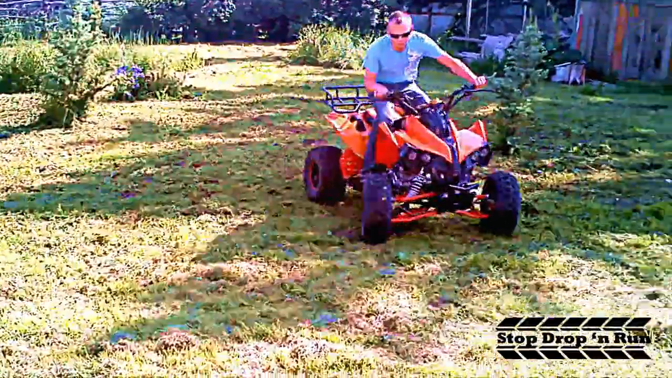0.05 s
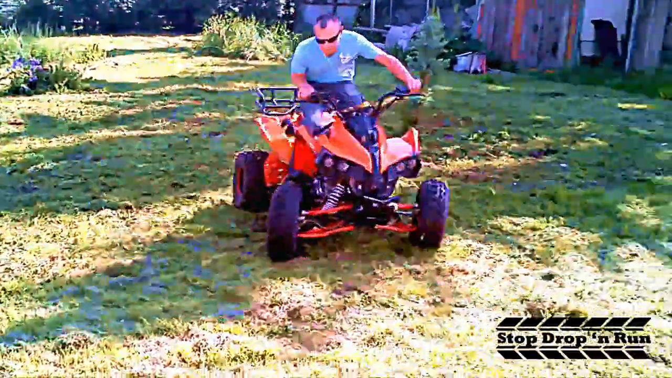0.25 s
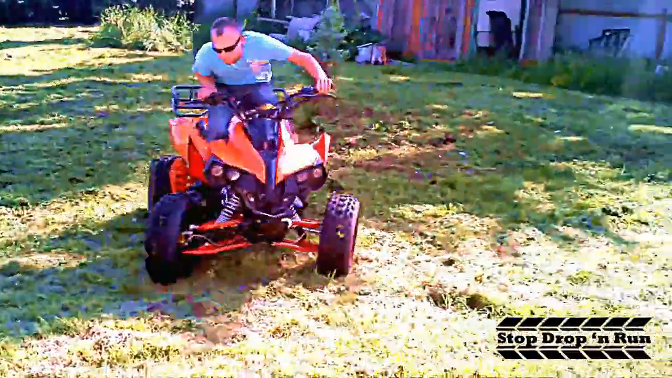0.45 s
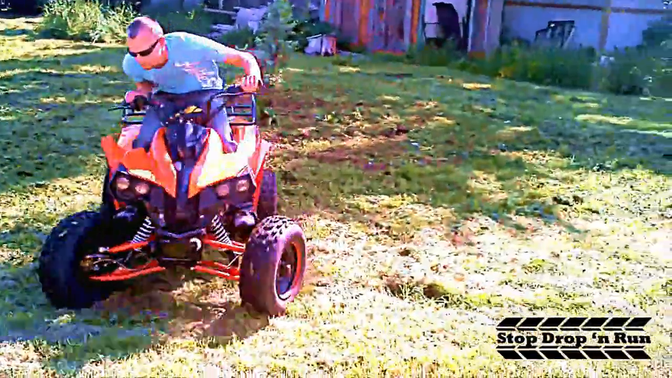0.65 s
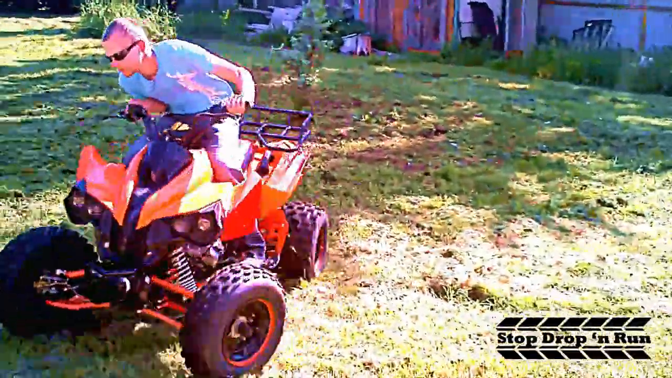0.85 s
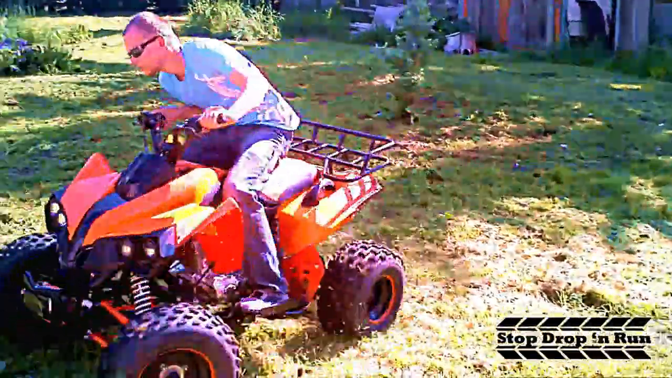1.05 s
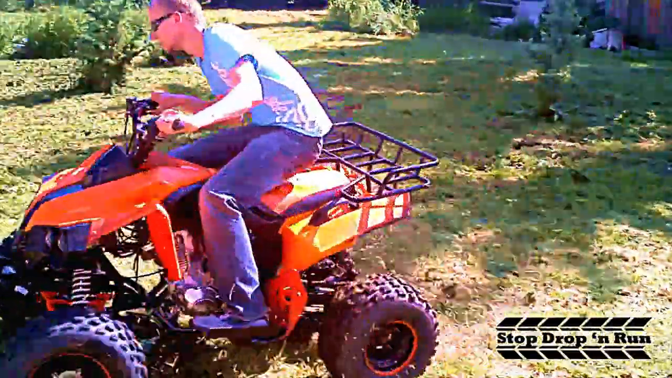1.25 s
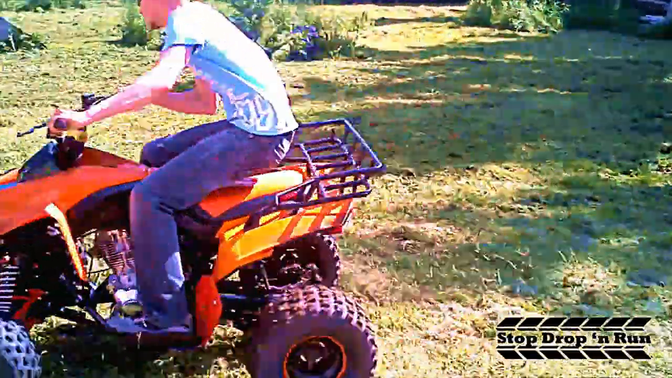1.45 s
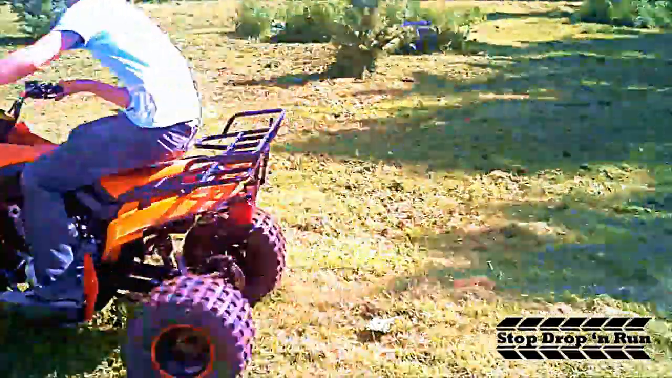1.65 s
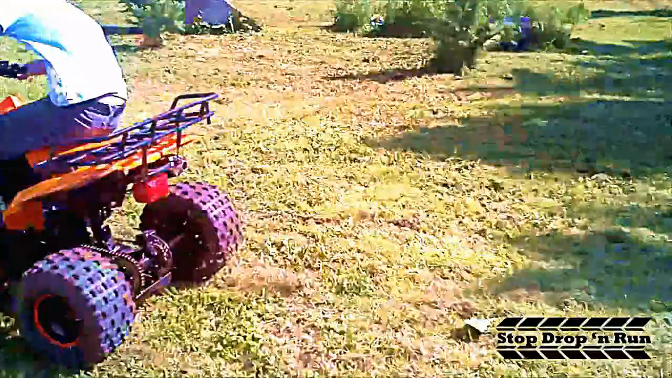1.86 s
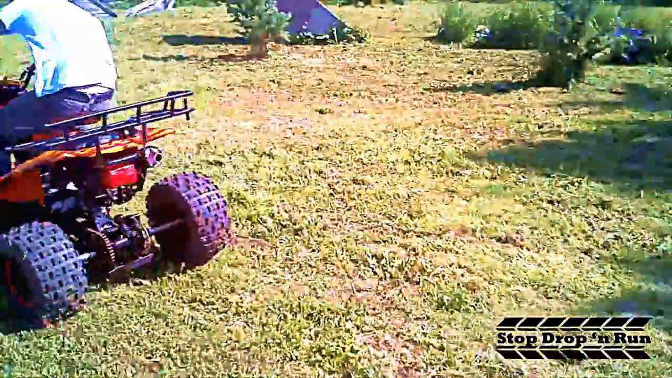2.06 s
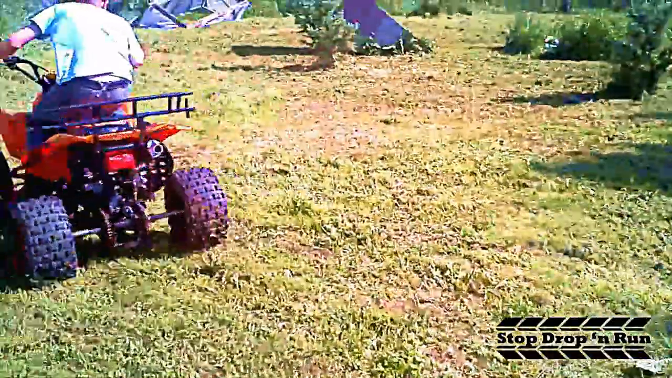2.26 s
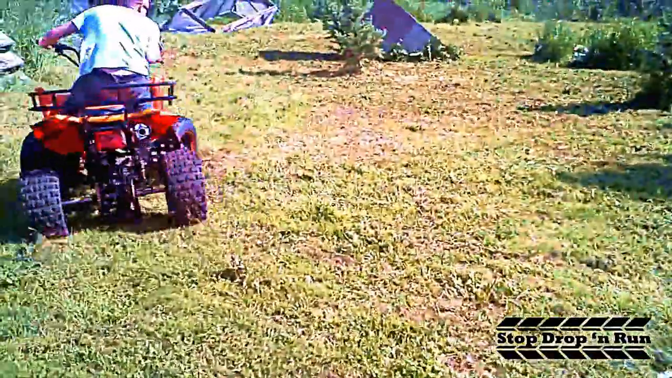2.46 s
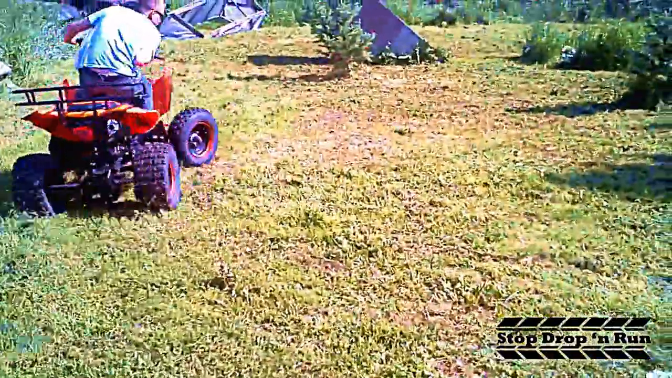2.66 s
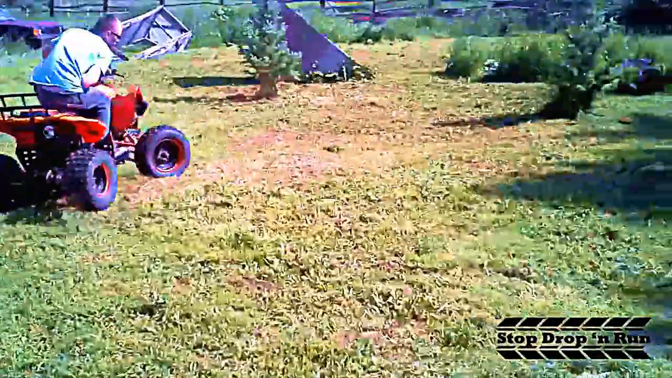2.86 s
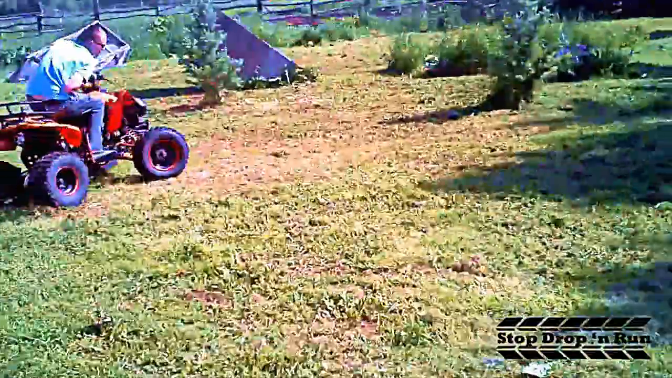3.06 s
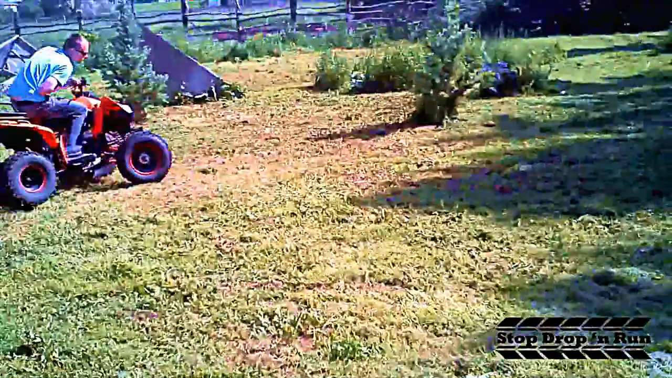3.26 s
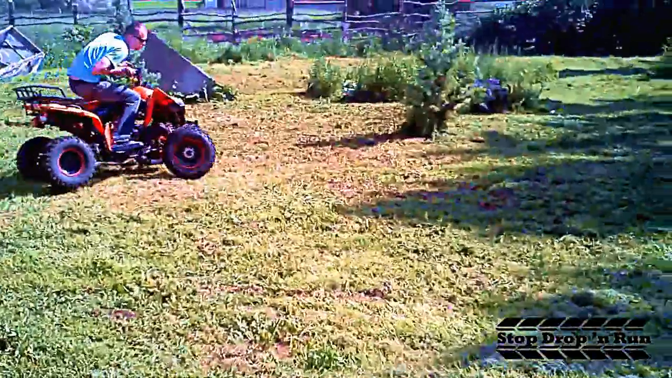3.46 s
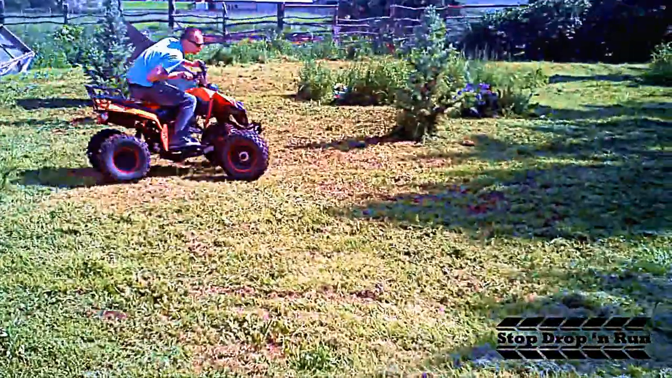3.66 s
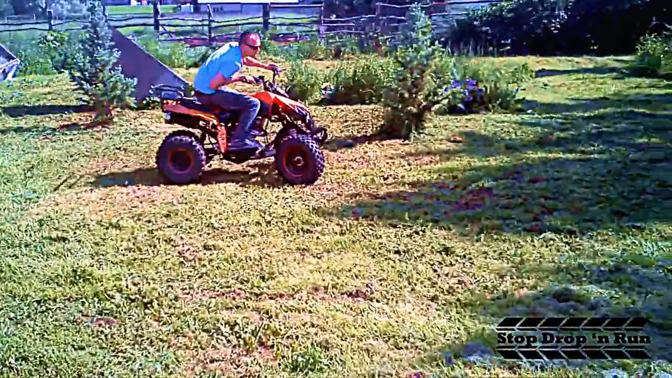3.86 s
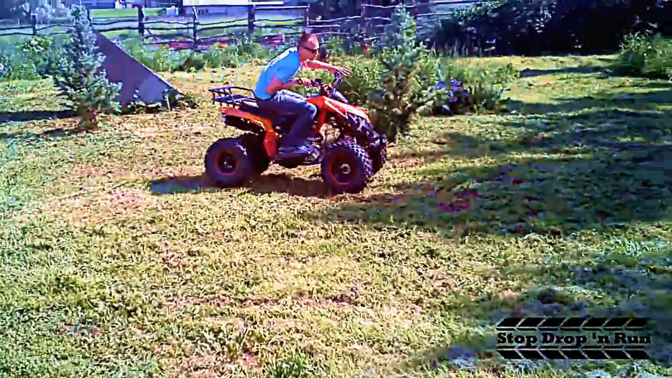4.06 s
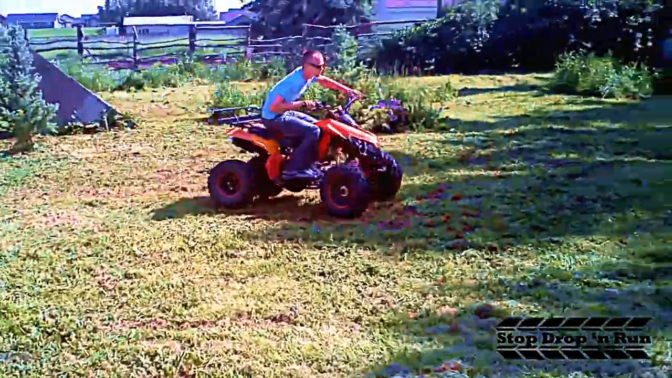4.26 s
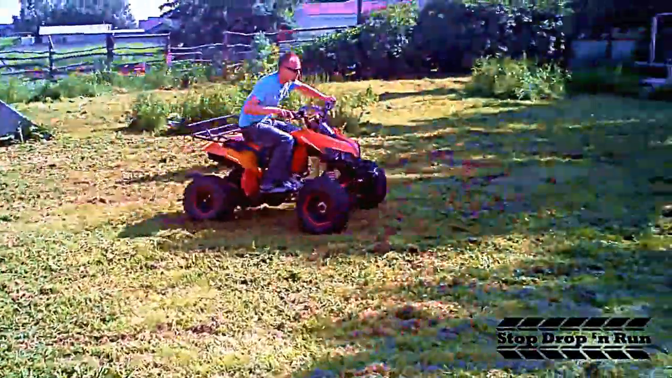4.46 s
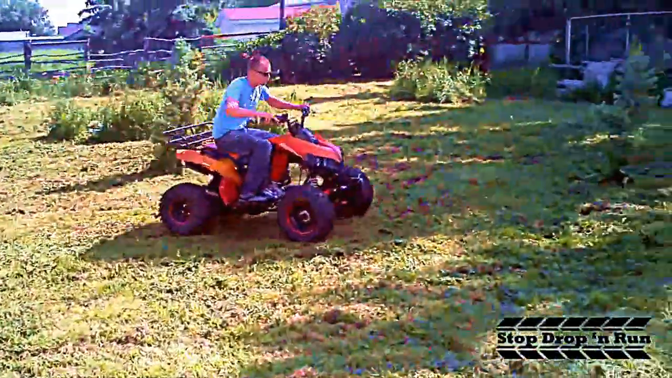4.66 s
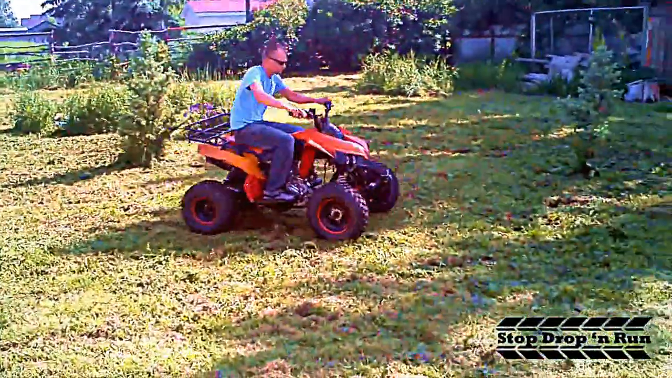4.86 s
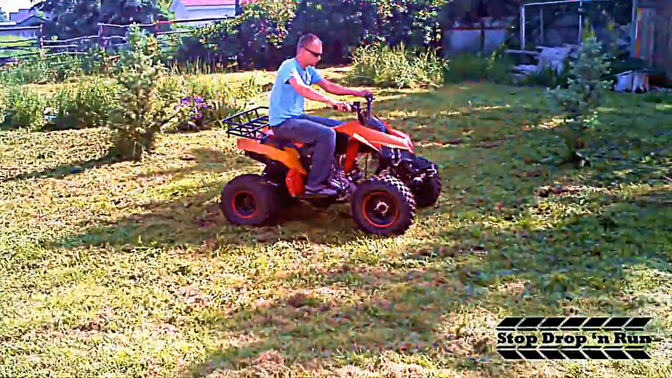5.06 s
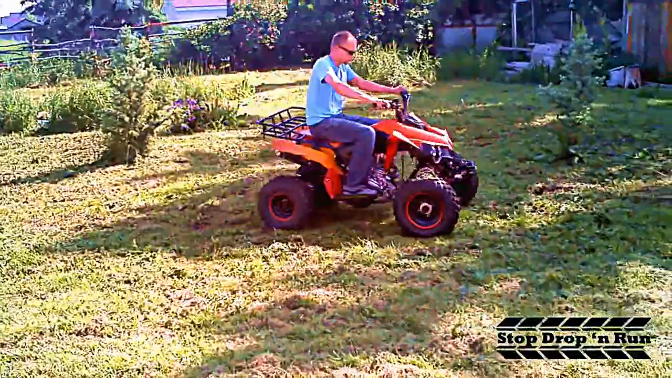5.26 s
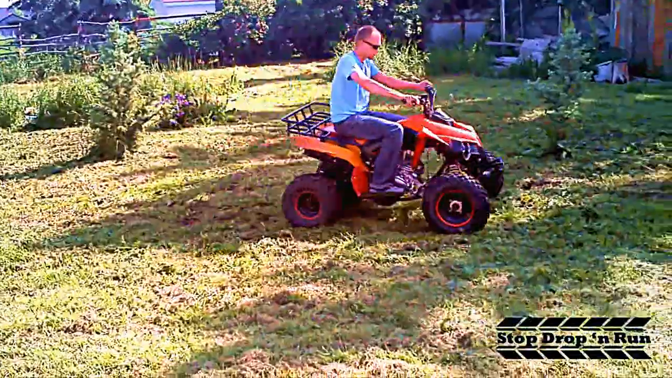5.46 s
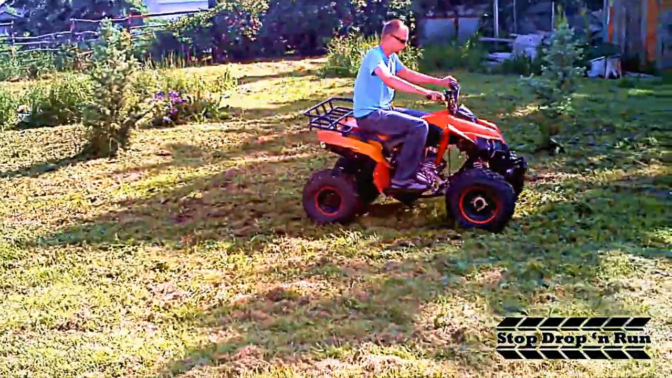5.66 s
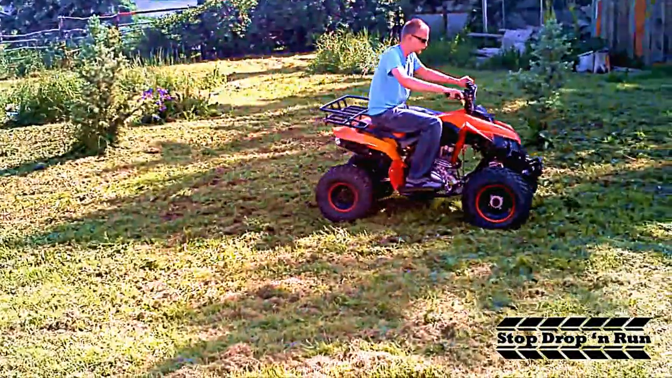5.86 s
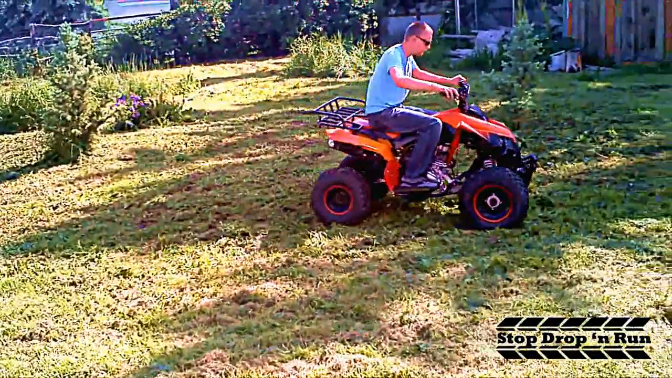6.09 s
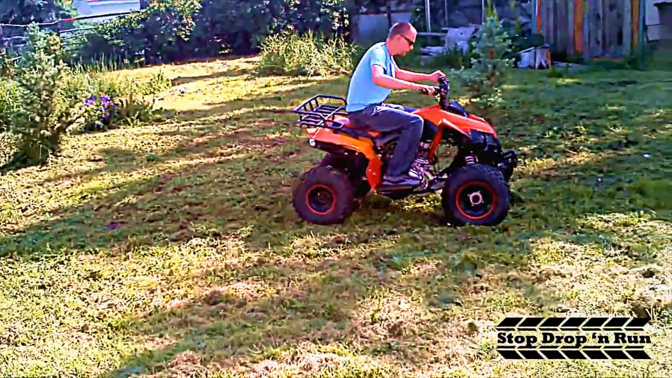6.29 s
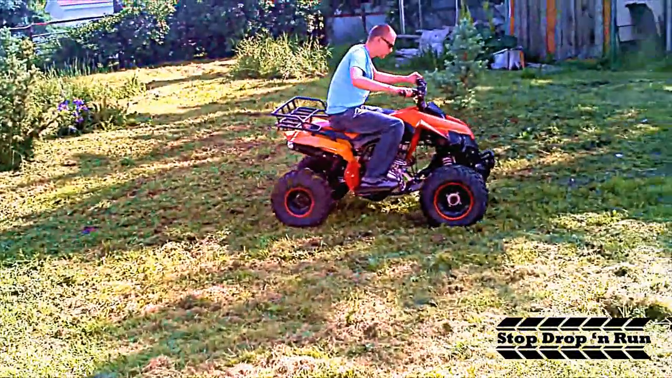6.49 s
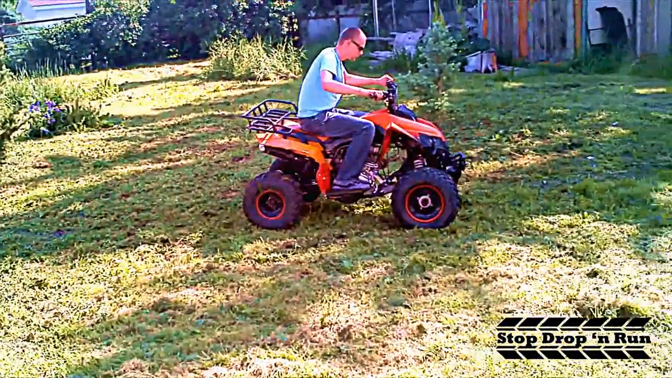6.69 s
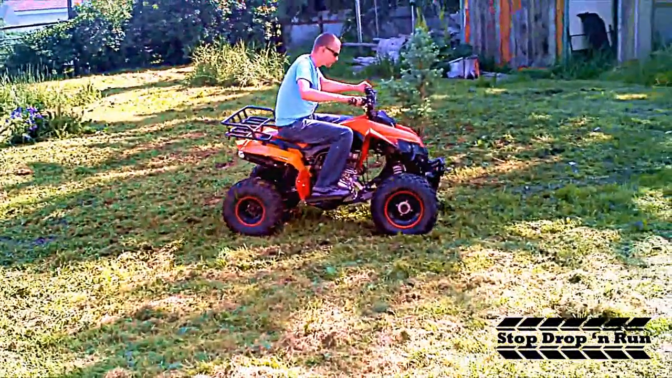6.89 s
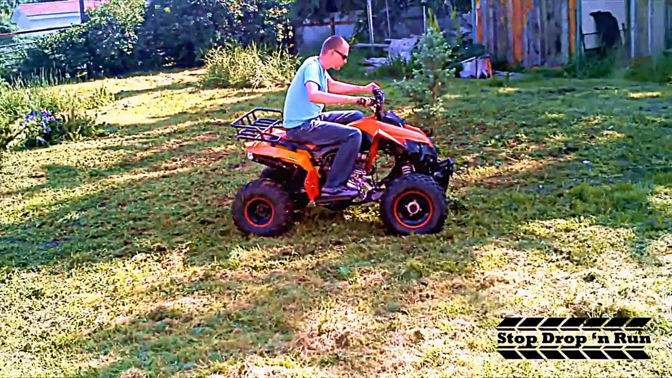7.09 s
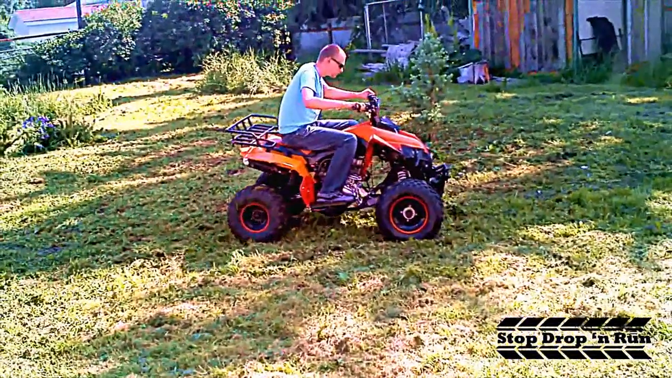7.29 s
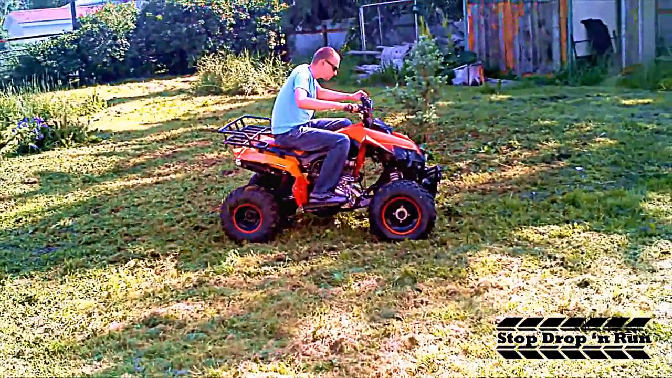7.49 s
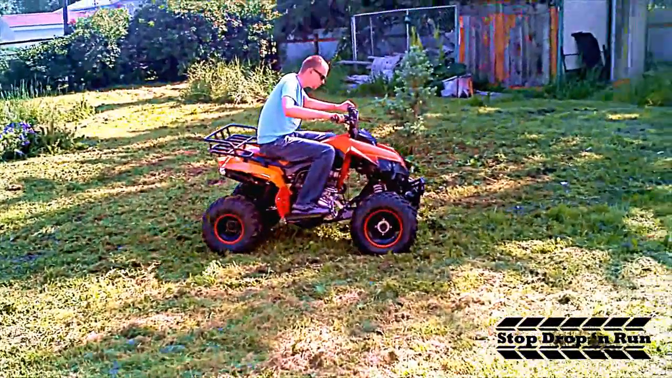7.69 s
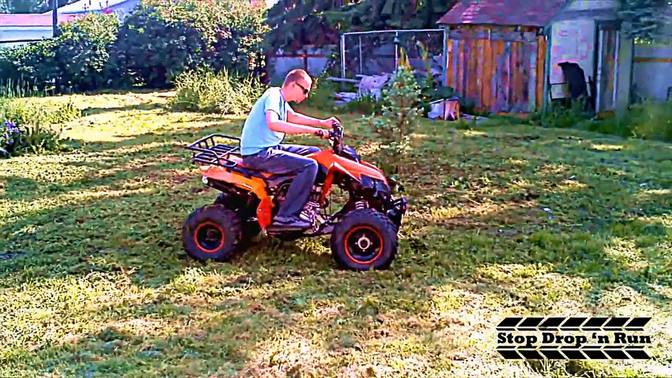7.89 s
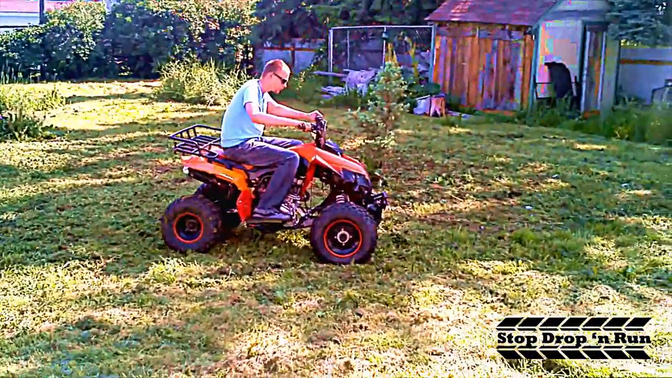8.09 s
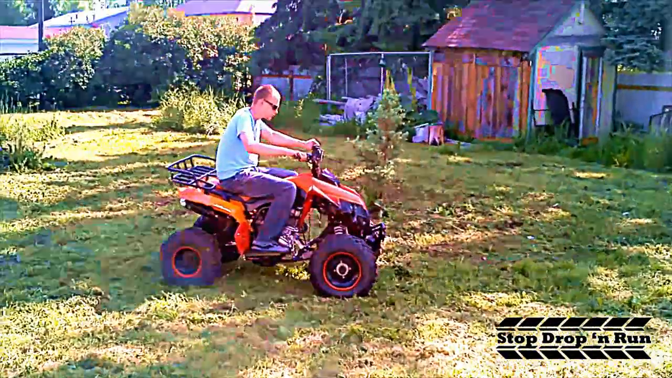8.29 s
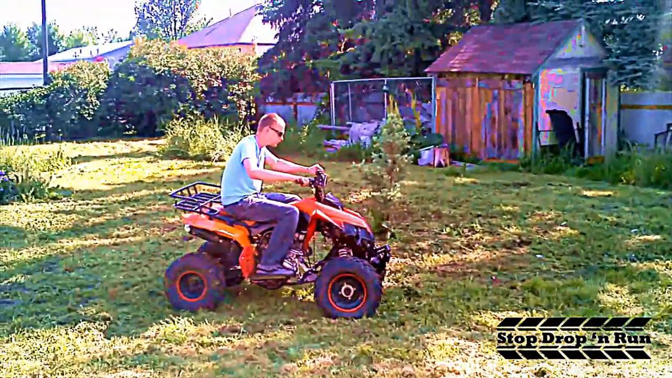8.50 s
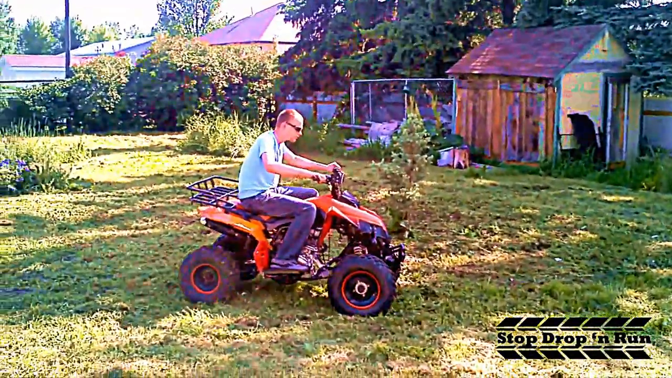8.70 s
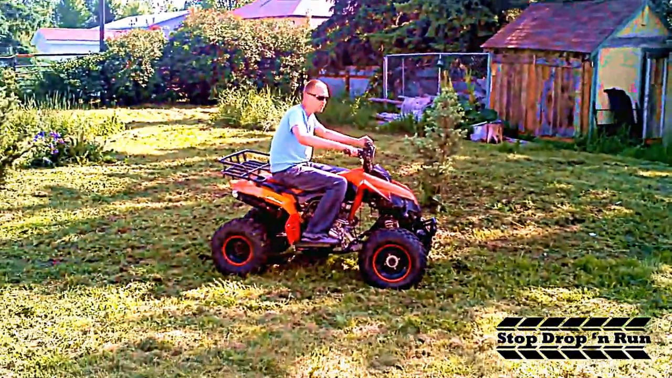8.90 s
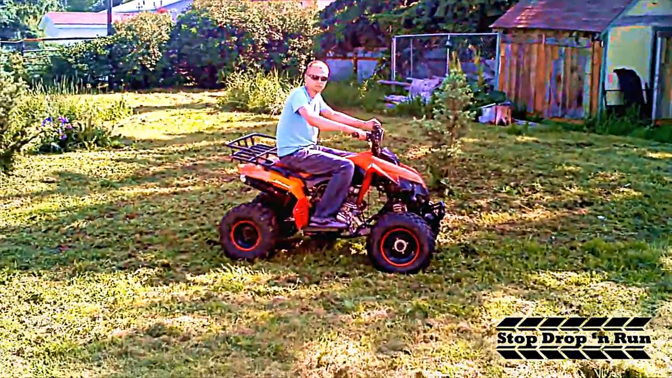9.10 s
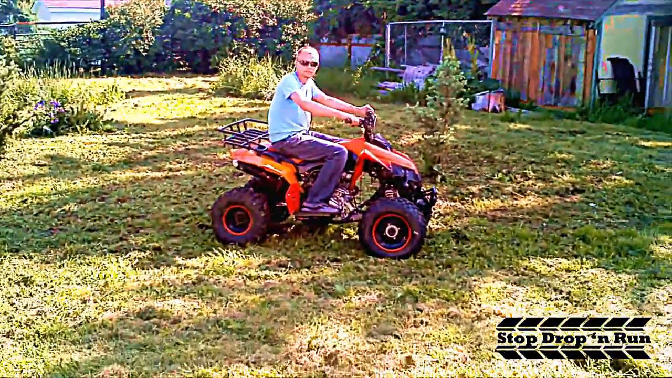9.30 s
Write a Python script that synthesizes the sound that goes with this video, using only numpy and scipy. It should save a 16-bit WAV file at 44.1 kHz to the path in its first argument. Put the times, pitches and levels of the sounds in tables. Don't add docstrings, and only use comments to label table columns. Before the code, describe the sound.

Outdoors on a lawn among sheds and fences, a small single-cylinder quad bike circles close to the microphone. Its loud exhaust barks and drones as the throttle rises and dips, with hissing valves, faint chain rattle and a few backfires. Then it coasts down to a slow, separate thumping idle, broken by short throttle blips that sag back to idle.

```python
import sys
import numpy as np
from scipy import signal
from scipy.fft import rfft, irfft, next_fast_len
from scipy.io import wavfile
from scipy.ndimage import uniform_filter1d, map_coordinates

SR = 44100
rng = np.random.default_rng(int(sys.argv[2]) if len(sys.argv) > 2 else 0)


def wav_record(signal):
    frames = np.transpose(np.atleast_2d(signal))
    bounded = np.clip(frames, -1, 1)
    quanta = np.round(bounded * 32767).astype(np.int16)
    wavfile.write(sys.argv[1], SR, quanta)


def invert_db(level):
    return 10 ** (np.asarray(level, dtype=float) / 20)


N = 411893

# [s, 1/s].
SPEED_STRETCHES = [
    [(0.0, 49.77), (0.12, 42.38), (0.237, 37.17), (0.4, 35.38), (0.541, 32.89), (0.63, 39.22),
     (0.732, 45.8), (0.85, 45.95), (0.96, 45.46)],
    [(1.1, 49.84), (1.2, 51.74), (1.35, 53.69), (1.469, 54.15), (1.58, 50.94), (1.7, 47.67), (1.8, 50.23),
     (1.89, 52.27), (1.975, 53.21)],
    [(2.05, 49.63), (2.196, 41.96), (2.31, 42.6), (2.42, 47.91), (2.52, 51.61), (2.7, 49.93), (2.8, 54.26),
     (2.903, 56.73), (3.0, 57.02)],
    [(3.104, 55.11), (3.197, 58.35), (3.3, 56.69), (3.37, 49.84), (3.5, 46.23), (3.59, 46.64)],
    [(3.733, 56.07), (3.84, 53.72), (3.931, 52.78), (4.05, 55.34), (4.17, 57.48), (4.27, 49.64)],
    [(4.433, 45.03), (4.7, 36.19), (5.0, 25.11), (5.269, 17.12)],
    [(5.591, 12.17), (5.75, 12.17), (5.9, 12.36), (6.05, 12.9), (6.2, 12.91), (6.5, 12.83), (6.733, 13.19)],
    [(6.9, 12.93), (7.1, 13.15), (7.3, 13.11), (7.45, 12.95), (7.6, 12.81), (7.8, 13.12), (8.0, 13.14)],
    [(8.2, 12.98), (8.35, 12.83), (8.5, 13.59), (8.7, 12.94), (8.9, 12.88), (9.1, 12.89), (9.34, 12.98)],
]
# [s, s, 1/s].
BLIPS = [
    (6.71, .334, 15.21),
    (7.415, .224, 10.57),
    (8.3, .332, 12.99),
    (9.08, .25, 2.2),
]
# [s, ratio].
THROTTLE = [(0, 0.23), (.52, 0.8), (2.0, 0.57), (2.28, 0.92), (3.3, 0.34), (3.5, 0.79), (3.66, 0.7),
            (4.17, 0.24), (4.42, 0.23), (5.42, 0.6), (6.76, 0.93), (6.97, 0.32), (7.43, 0.9), (7.57, 0.34),
            (8.3, 1), (8.52, 0.36), (9.1, 0.52)]
# [s, dB].
ODD_FIRINGS = [
    (5.4, 1),
    (5.475, 3.5),
    (5.55, -3),
    (7.35, -3.5),
    (8.61, -4.5),
    (8.92, -1),
]
# [s, dB, dB, dB, Hz].
PATH = [(0, 3, 1.5, 0, 7), (.35, 1.5, -2, 10.5, 40), (.62, 0.5, 4, -3, 25), (1.05, -1, 1, 0.5, 58),
        (1.4, 1, -4.5, -9, 54), (1.9, 2, -0.5, -0.5, 36), (2.15, 2.5, -8, -2, -12), (2.5, 0, -2, -3, -6),
        (2.95, 0, -4.5, -24.5, -21), (3.25, -1, -6, -18, 7), (3.45, -2, -1, 4, -12),
        (3.95, -0.5, -5.5, -17, -8), (4.6, 0, -2.5, -11.5, 12), (5.35, -4.5, -2.5, 6.5, 2),
        (6.7, 3, -3.5, 6, 10), (7.3, 6, -6, 0, -30), (8.2, 4.5, -4, 4.5, 1), (9.3, 2.5, -6.5, 4, -28)]
# [s, Hz, dB, Hz, dB].
OUTLET = [(0, 800, -9, 635, 5.5), (.7, 780, 1.5, 559, -6.5), (1.05, 870, 0, 580, 1),
          (1.35, 760, 1, 597, -4.5), (1.6, 724, 0.5, 676, -8), (1.95, 785, -5, 590, -3),
          (2.2, 668.5, 2.5, 590, -36), (2.42, 729, 6, 583, -22), (2.9, 780, 2, 592, -14),
          (3.8, 770.4, -3.5, 603, -7), (4.15, 837, -2, 647, -6.5), (4.6, 674.3, -11, 553, 4),
          (5.3, 850, -7, 643, -6), (5.9, 920, -3, 686, -20), (6.6, 900, -3.5, 684, -13),
          (7.1, 830, -8.5, 650, -5.5), (8.2, 893, -7, 706, -6), (9.3, 956, -3, 683, -9.5)]
# [s, dB, dB].
BOOM = [(0, -2, -3), (.25, -12, -5.5), (.45, -4, 6), (.7, -2, -4), (1.2, -5, -1), (1.9, -10, -4),
        (2.05, -3, 1), (2.25, 3, -1.5), (2.45, -13, -2.5), (2.8, -7, 4), (2.95, 2, 6), (3.2, -5.5, -3),
        (3.35, 3, 5.5), (3.55, -2, -6), (3.9, -6.5, 0), (4.08, 1, 9), (4.3, -2, -5), (4.5, -1, -1),
        (5, 1, -2), (6.8, 2, -0.5), (7.05, 2, 0), (7.25, 5, -5), (7.5, -3, 0.5), (7.65, 0, 1.5),
        (7.85, 0, -2), (8.05, -1, 1.5), (8.45, 4, -1), (8.65, 0, -2), (8.9, 6, -2), (9.3, 0, 1)]
# [s, dB, dB].
BACKFIRES = [
    (3.0958, -13, -4),
    (3.5068, -15.5, 1.5),
    (3.5217, -24.5, 6),
    (4.043, -18, -35),
    (6.906, -20, -7),
    (8.445, -38.5, 13.5),
]
# [s, dB].
STANDING_HISS = [(4.8, 0), (5.3, 3), (6.2, 1.5), (7, 2.5), (8.2, 2.5), (9.2, 1.5)]
# [Hz, dB].
METAL = [(300, -120), (700, 10), (1400, 1), (2500, 2), (4800, -5.5), (8000, 1), (10000, 0), (14000, -9)]
# [s, dB].
ROLLING = [(0, -34.5), (.3, -44), (.7, -37.5), (2, -34), (3.4, -50), (4.15, -34.5), (4.7, -37), (4.8, -52),
           (5.3, -58)]
# [Hz, dB].
CHAIN = [(3500, -120), (5000, -10), (7800, -1.5), (9800, 3), (11500, -27), (16000, -36)]
# [s, dB].
WALLS = [(.0148, -14), (.0237, -14), (.037, -12), (.052, -15)]
# [Hz, s].
YARD = [(100, 0.94), (1000, 0.056), (10000, 0.0043)]
# [Hz, dB].
AIR = [(20, 2), (60, 2), (100, 0), (200, -6), (500, -16), (2000, -27), (8000, -38), (16000, -46)]
# [s, dB].
BEARING = [(0, .5), (.7, 1), (1.2, 2), (2, 3), (2.6, 4.5), (3.2, 4.5), (4, 4.5), (4.8, 3), (5.7, 1),
           (7.2, .5), (8.2, 1), (9.3, 2.5)]
# [Hz, dB].
APART = [(80, -28), (150, -29), (300, -16), (420, -11), (700, -15), (1500, 3), (2500, 2), (16000, -1)]

FIRST_TURN = .9645
SAG_S, SAG_SHAPE = .368, 1.276
FIRST_OPENING, OPEN_S, SHUT_S = 0.28, 0.098, 0.059
FULL_SPEED = 50
ODD_S = .025
# (dB at full speed with the throttle shut, dB per doubling of speed, dB gained at full throttle)
THUMP, PIPE, BARK, HISS = (-34.5, 9.1, 16.1), (-29.5, 8.94, 10.6), (-35, 11.1, 19.38), (-33, 12.33, 7.16)
PUMP = (-29.5, 9.7, -0.67)
PIPE_COLD_HZ, PIPE_HZ_PER_SPEED, PIPE_HZ_OPEN = 265.5, 1.586, 6
BOX_COLD_HZ, BOX_HZ_PER_SPEED, BOX_HZ_OPEN = 126.6, 0.21, 18.4
BOX_T60, BOX_CYCLES = .06, 1.3
SMOOTH, OVERRUN = .012, .025
EDGE_DB, EDGE_FOLLOWS = -16.5, 0.48
OVERTONE, OVERTONE_DB, OVERTONE_OPEN_DB = 1.422, -13.5, 7.5
IDLE_OVERTONE_DB = -5
POP_HZ, POP_DB, POP_BELOW = 1500, -5, .3
PUMP_HZ, PUMP_FALL_DB = 131.4, 9
SECOND_DB, FOURTH_DB = -10.5, -7
SPIT_RISE_S, SPIT_S, SPIT, SPIT_SCATTER_DB = .002, .005, 1.6, 4
PORT_DELAY = 15 / SR
TOP_HZ = 15800
WEAK = .75


def unit(x):
    return x / np.sqrt(np.mean(x ** 2, axis=-1, keepdims=True) + 1e-20)


def along(points, hz):
    f, v = np.transpose(points)
    return np.interp(np.log(hz + 1), np.log(f + 1), v)


def curves(rows, t):
    s, *cols = np.transpose(rows)
    return [np.interp(t, s, c) for c in cols]


def filtered(x, response):
    m = next_fast_len(N + SR // 4)
    return irfft(rfft(x, m) * response(np.fft.rfftfreq(m, 1 / SR)), m)[..., :N]


def hiss(spectrum):
    return unit(filtered(rng.standard_normal(N), lambda hz: invert_db(along(spectrum, hz))))


def wobble(rate):
    return map_coordinates(rng.standard_normal(int(N * rate / SR) + 4), [np.arange(N) * rate / SR])


def speed_at(t):
    s, climb, gain = np.transpose(BLIPS)[..., None]
    up = np.sin(np.pi / 2 * np.clip((t - s) / climb, 0, 1)) ** 2
    down = np.exp(-(np.clip(t - s - climb, 0, None) / SAG_S) ** SAG_SHAPE)
    return curves(sum(SPEED_STRETCHES, []), t)[0] + np.sum(gain * up * down, axis=0)


def throttle_at(t):
    s, opening = np.transpose(THROTTLE)[..., None]
    step = np.diff(opening, axis=0, prepend=FIRST_OPENING)
    glide_s = np.where(step > 0, OPEN_S, SHUT_S)
    return FIRST_OPENING + np.sum(step * np.clip((t - s) / glide_s, 0, 1), axis=0)


def crank():
    t = np.arange(N) / SR
    turn = FIRST_TURN + np.cumsum(speed_at(t)) / SR
    return turn, np.interp(np.arange(1, int(turn[-1]) + 1), turn, t)


def level(layer, t):
    base_db, per_doubling_db, open_db = layer
    odd_db = sum(db * (np.abs(t - s) < ODD_S) for s, db in ODD_FIRINGS)
    speed_db = per_doubling_db * np.log2(speed_at(t) / FULL_SPEED)
    return base_db + speed_db + open_db * throttle_at(t) + curves(PATH, t)[0] + odd_db


def bursts(s, hz, energy, t60, rise, size):
    s = s.clip(0)
    start = np.floor(s * SR).astype(int) + 1
    t = (start / SR - s)[:, None] + np.arange(size) / SR
    fade = np.cos(np.pi / 2 * np.arange(size) / size)
    decay = invert_db(-60 * t / np.reshape(t60, (-1, 1)))
    wave = -np.sin(2 * np.pi * hz[:, None] * t) * decay * (1 - np.exp(-t / rise)) * fade
    wave = unit(wave) * np.sqrt(energy / size)[:, None]
    return np.bincount((start[:, None] + np.arange(size)).ravel(), wave.ravel(), N + SR)[:N]


def resonance(fire, hz, db, rough, t60, rise, spread, size, count=2):
    period = 1 / speed_at(fire)
    luck = rng.standard_normal((len(fire), 2))
    energy = invert_db(db + 0.18 * luck[:, 0]) ** 2 * period * SR
    clean = bursts(fire + 6e-5 * luck[:, 1], hz, energy * (1 - rough), t60, rise, size)
    when = fire[:, None] + period[:, None] * rng.random((len(fire), count))
    pitch = hz[:, None] * np.exp(spread * rng.standard_normal(when.shape))
    share = np.repeat(energy * rough / count, count)
    puff_t60 = np.repeat(t60 + 0 * fire, count)
    return clean + bursts(when.ravel(), pitch.ravel(), share, puff_t60, rise, min(size, 800))


def exhaust(fire):
    speed, opening = speed_at(fire), throttle_at(fire)
    period = 1 / speed
    same = 0 * fire
    _, pipe_shade_db, box_shade_db, shift_hz = curves(PATH, fire)
    bark_hz, facing_db, ring_hz, ring_db = curves(OUTLET, fire)
    thump_db = level(THUMP, fire) + box_shade_db + curves(BOOM, fire)[1]
    pipe_db = level(PIPE, fire) + pipe_shade_db
    bark_db = level(BARK, fire) + facing_db
    edge_db = EDGE_DB + EDGE_FOLLOWS * ring_db
    rough = np.clip(SMOOTH + OVERRUN * (1 - opening) * np.clip(speed / 6 - 2.3, 0, 1), 0, .45)
    start = fire - .001 - 0.0284 * period
    later = start + 0.002435 + 0.021 * period

    box_hz = BOX_COLD_HZ + BOX_HZ_PER_SPEED * speed + BOX_HZ_OPEN * opening
    box_t60 = BOX_T60 + BOX_CYCLES * period
    thump = resonance(later - .002, box_hz, thump_db - 1.5, rough / 2, box_t60, rise=.001, spread=.2, size=3000)
    push = resonance(later, 285 + same, pipe_db - 10.5 - 250 * period, rough / 2,
                     t60=0.053, rise=0.0012, spread=0.16, size=1000)

    steady_hz = PIPE_COLD_HZ + PIPE_HZ_PER_SPEED * speed + PIPE_HZ_OPEN * opening
    pipe = resonance(later, steady_hz + shift_hz, pipe_db - 1.5, rough, 1.6 * period,
                     rise=.001, spread=.2, size=3000)
    overtone_db = OVERTONE_DB + OVERTONE_OPEN_DB * opening + IDLE_OVERTONE_DB * np.clip(3 - speed / 7, 0, 1)
    overtone = resonance(later, OVERTONE * steady_hz, pipe_db + overtone_db, rough * 2, 0.82 * period,
                         rise=0.0048, spread=0.21, size=2000)

    bark = resonance(start, bark_hz, bark_db - 8.0, rough, t60=0.046, rise=0.0009, spread=0.205, size=300)
    ring = resonance(start + 0.0011, ring_hz, bark_db + ring_db, rough,
                     t60=0.043, rise=0.00051, spread=0.13, size=1100)
    edge = resonance(start + 0.001054, 1480 + same, bark_db + edge_db, rough * 2,
                     t60=0.0044, rise=0.0014, spread=0.16, size=500)

    pop_db = level(HISS, fire) + POP_DB - 60 * np.clip(opening - POP_BELOW / 2, 0, 1)
    pop_db = pop_db - 4.5 * np.clip(16 - speed, 0, 9) - .35 * np.clip(speed - 32, 0, None)
    pop_hz = POP_HZ * np.exp(.07 * rng.standard_normal(len(fire)))
    pop = resonance(start, pop_hz, pop_db, rough * 4, t60=.018, rise=.0015, spread=.1, size=700)
    return thump + push + pipe + pop + overtone + bark + ring + edge


def pumping(turn, fire):
    t, tones = np.arange(N) / SR, 0
    speed = speed_at(fire)
    base_db = level(PUMP, fire) + 0.09 * curves(PATH, fire)[2] + curves(BOOM, fire)[0]
    load_db = FOURTH_DB * throttle_at(fire) * (speed > 44)
    for k in range(2, 7):
        drift_db = 1.8 * unit(uniform_filter1d(rng.standard_normal(len(fire)), size=9))
        silencer_db = -PUMP_FALL_DB * np.log2(k * speed / PUMP_HZ) ** 2
        db = base_db + SECOND_DB * (k == 2) + load_db * (k == 4) + drift_db + silencer_db
        tones = tones + np.interp(t, fire, invert_db(db)) * np.sin(2 * np.pi * (k * turn + rng.random()))
    return np.sqrt(2) * tones


def backfires():
    s, db, crack_db = np.transpose(BACKFIRES)
    bark = bursts(s, 760 + 0 * s, invert_db(db + 24.5) ** 2, t60=0.0059, rise=0.00018, size=400)
    push = bursts(s, 90 + 0 * s, invert_db(db - 23) ** 2, t60=0.014, rise=0.001, size=1500)
    since = np.arange(N) / SR - s[:, None]
    decay = np.where(since > 0, invert_db(-60 * np.abs(since) / 0.019), 0)
    return bark + push, invert_db(db + crack_db) @ decay


def machinery(turn, fire):
    speed = np.gradient(turn) * SR
    since = ((turn + .033) % 1) / speed
    puff = SPIT * invert_db(SPIT_SCATTER_DB * rng.standard_normal(len(fire) + 2))[(turn + .033).astype(int)]
    fall = puff * np.exp(-since / SPIT_S) + .7 * np.exp(-since / .035)
    spit = .04 + speed / 65 + fall * (1 - np.exp(-since / SPIT_RISE_S))
    spit /= np.sqrt(np.abs(uniform_filter1d(spit ** 2, size=6600)))
    cycle = np.clip((turn + .03).astype(int) - 1, 0, len(fire) - 1)
    firing_db = curves(STANDING_HISS, fire)[0] + level(HISS, fire) + 0.36 * rng.standard_normal(len(fire))
    return invert_db(firing_db[cycle] - 1.0 + 0.73 * wobble(250) + 0.93 * wobble(25)) * spit


def chain():
    return invert_db(curves(ROLLING, np.arange(N) / SR)[0] + 1.13 * wobble(240) + 2.7 * wobble(16))


def walls(x):
    def echoes(hz):
        arrivals = sum(invert_db(db) * np.exp(-2j * np.pi * hz * s) for s, db in WALLS)
        return arrivals / (1 + 1j * hz / 400)
    return filtered(x, echoes)


def decay_tail(t60, size):
    hz, t, z = signal.stft(rng.standard_normal(size), SR, nperseg=256)
    tail = signal.istft(z * invert_db(-60 * t / along(t60, hz)[:, None]), SR, nperseg=256)[1]
    return tail / np.linalg.norm(tail)


def port_difference(common, note, rush, rattle):
    pan = invert_db(curves(BEARING, np.arange(N) / SR)[0])
    lead = PORT_DELAY * (pan - 1) / (pan + 1)
    slope = filtered(common, lambda hz: 1j * np.pi * hz / (1 + (hz / 2200) ** 4))
    drift = 3 * wobble(3)
    paths = [signal.fftconvolve(note, decay_tail([(100, 0.063)], size=2048))[:N] for _ in "ab"]
    scattered = np.cos(drift) * paths[0] + np.sin(drift) * paths[1]
    scattered = scattered + rattle * hiss(CHAIN) + rush * hiss(METAL) + invert_db(-49) * hiss(AIR)
    return lead * slope + filtered(scattered, lambda hz: invert_db(along(APART, hz)))


def scene():
    turn, fire = crank()
    bang, crack = backfires()
    note = exhaust(fire) + pumping(turn, fire) + bang
    note = note + walls(note)
    rush = machinery(turn, fire) + crack
    rattle = chain()
    bike = note + rush * hiss(METAL) + rattle * hiss(CHAIN)
    yard = signal.fftconvolve(np.pad(bike, (1300, 0)), decay_tail(YARD, size=13000))[:N]
    common = bike + invert_db(-20) * yard + invert_db(-49) * hiss(AIR)
    differ = port_difference(common, note, rush, rattle)
    return np.array([common + differ, common - differ])


def hollow(x):
    hz, t, z = signal.stft(x.mean(axis=0), SR, nperseg=1024)
    notch_hz = np.array([[1], [2], [3], [4], [5]]) / PORT_DELAY
    off = np.abs(hz - 50 - notch_hz)
    waver = unit(uniform_filter1d(rng.standard_normal((5, len(t))), size=11, axis=1))
    reach = [[330], [330], [-40], [110], [270]] + 130 * waver
    lost = (off[:, :, None] < reach[:, None, :]).any(axis=0)
    faint = np.abs(z) < WEAK * uniform_filter1d(np.abs(z), size=15, axis=0)
    lost = lost | (hz[:, None] > 1400) & faint
    return x - signal.istft(z * lost, SR, nperseg=1024)[1][:N]


def roll_off(x):
    return signal.sosfilt(signal.butter(12, 16510, fs=SR, output="sos"), x)


def record(dry):
    delayed = filtered(dry[::-1], lambda hz: .97 * np.exp(-2j * np.pi * hz * PORT_DELAY))

    def tone(hz):
        bass_lift = 1 + 1 / (2j * np.pi * (hz + 25) * PORT_DELAY)
        rumble_cut = (hz * hz / (hz * hz - 88 ** 2 - 1j * hz * 100)) ** 3
        return bass_lift * ((hz < TOP_HZ) * rumble_cut + (hz < 70) * invert_db(-25))

    x = filtered(dry - delayed, tone)
    mix = hollow(x / (1 + np.abs(x) ** 8) ** (1 / 8))
    return roll_off(mix)


dry = scene()
out = record(dry)
wav_record(out)
```